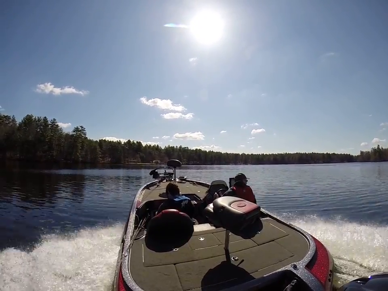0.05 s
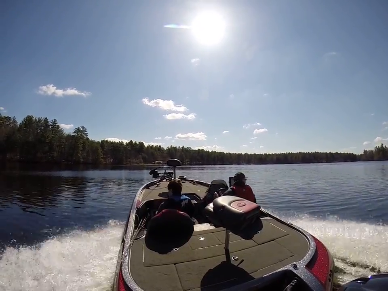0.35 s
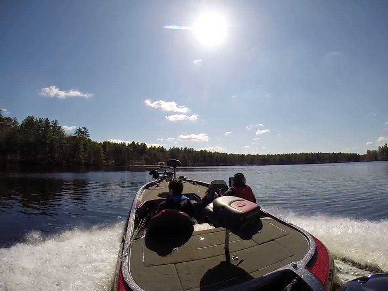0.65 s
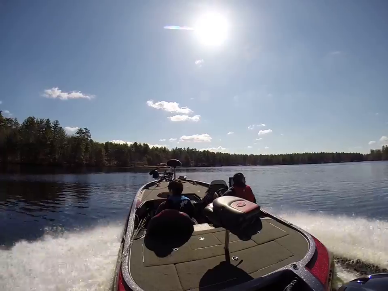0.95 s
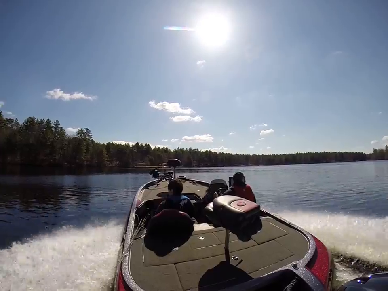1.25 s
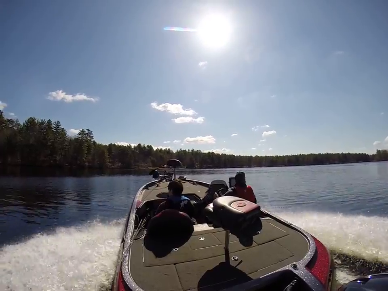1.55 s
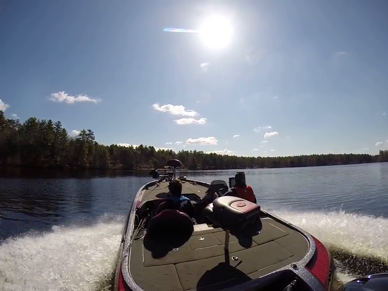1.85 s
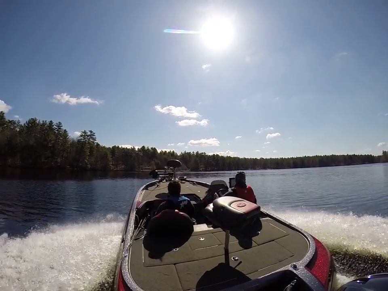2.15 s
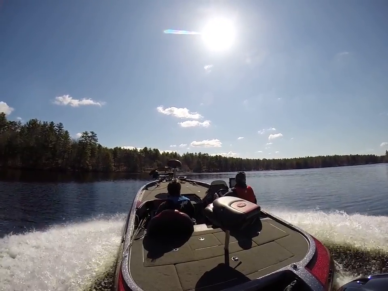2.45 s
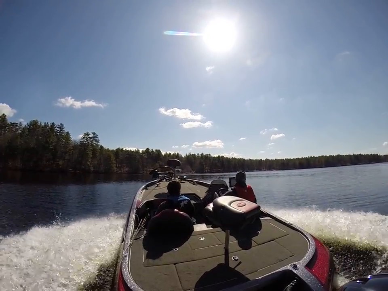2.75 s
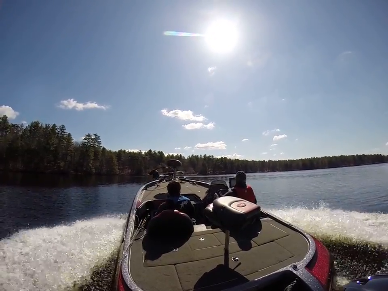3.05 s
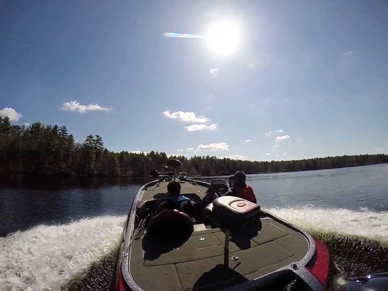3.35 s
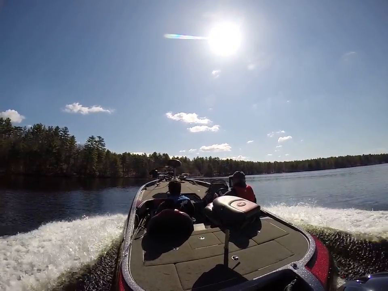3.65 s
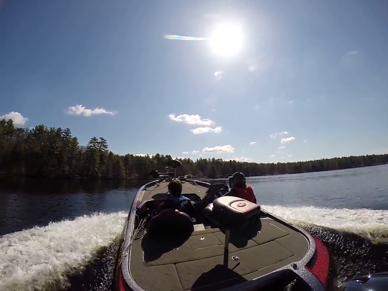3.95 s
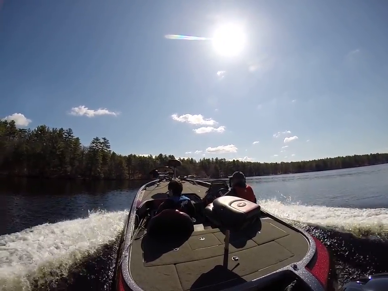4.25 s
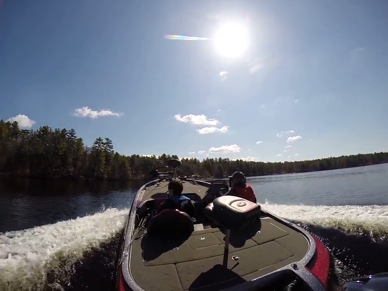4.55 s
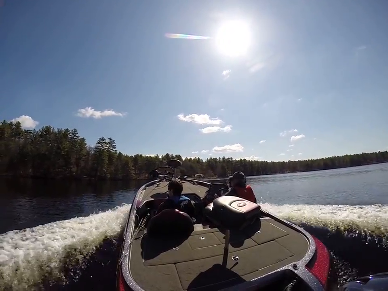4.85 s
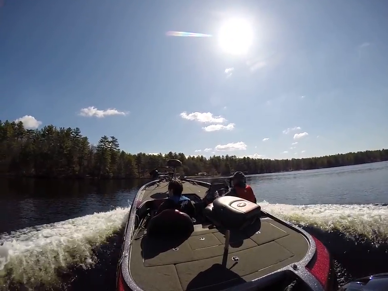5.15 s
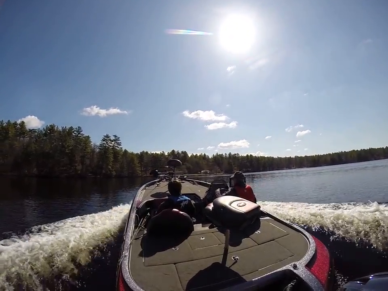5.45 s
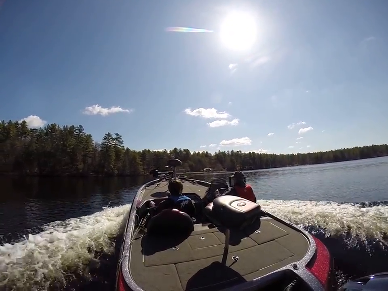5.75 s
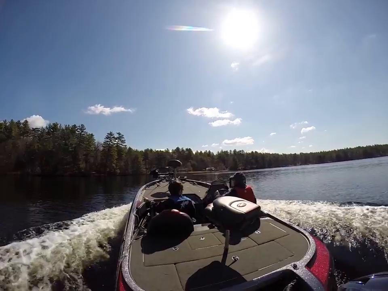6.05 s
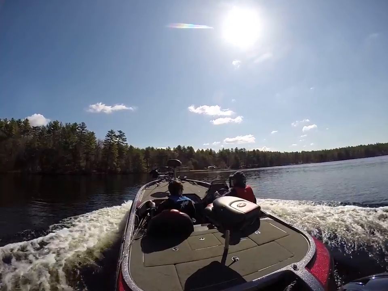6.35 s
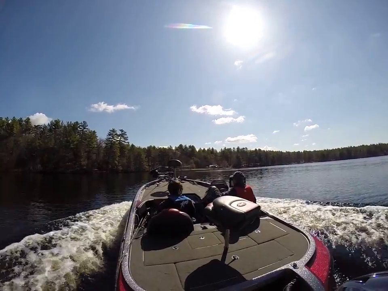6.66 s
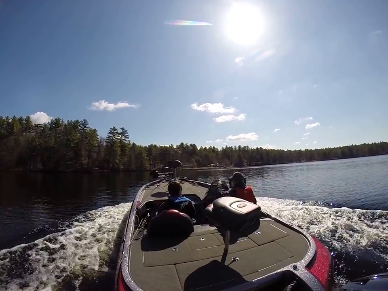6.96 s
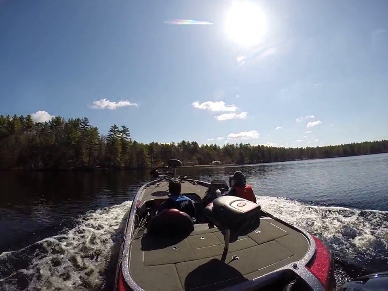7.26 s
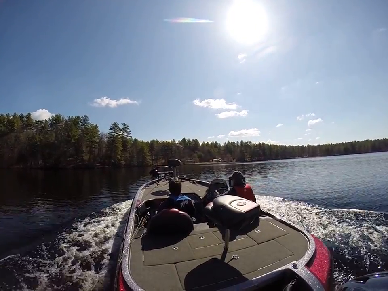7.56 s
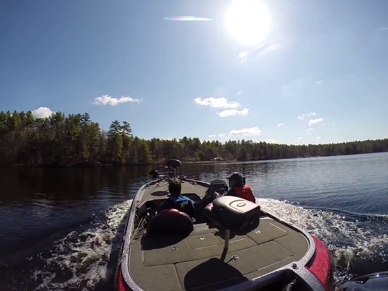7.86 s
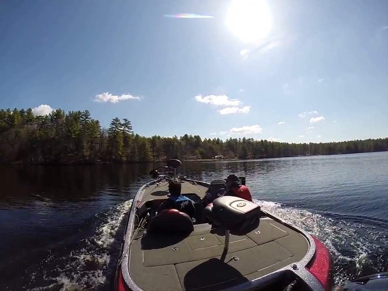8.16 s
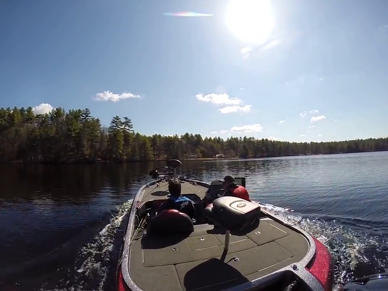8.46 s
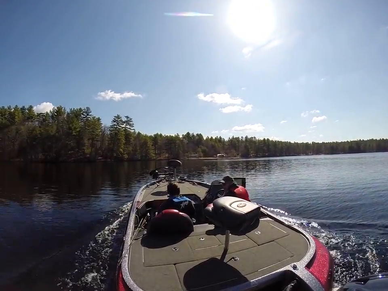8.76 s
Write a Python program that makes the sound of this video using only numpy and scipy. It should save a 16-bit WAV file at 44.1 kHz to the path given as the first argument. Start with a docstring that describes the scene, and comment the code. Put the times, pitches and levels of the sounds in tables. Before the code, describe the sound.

An outboard boat engine runs loudly from the start, heard close up at the stern: a deep, beating boom with a humming drone and a faint hollow roar. Beneath it the wake churns, spray hisses and the microphone's case buzzes thinly, with a few light ticks and knocks in the first three seconds. The engine's pitch sinks slowly until about 5 seconds, with the boom swelling around 3 to 4 seconds. From 4 to 7 seconds waves break in quick surges, with some slaps and rattles. The drone swells briefly near 5.4 seconds, then the pitch falls faster and the engine turns rough, ending almost an octave lower by 8 seconds. From 6 seconds the spray thins and the water breaks into separate laps, drips and thudding slaps on the hull, the strongest near 8.2 seconds. A low throbbing rumble continues to the end, at about 9 seconds.

```python
"""Outboard boat coming off the plane.

Propeller blades and exhaust banks of a four-stroke V6 beat in a deep boom. Engine orders drone in the
hull and cowl, sinking as the engine slows. The wake churns and slaps the stern, spray rushes past,
and a camera case on the stern buzzes, rattles and colours the water sounds."""
import sys
import numpy as np
from scipy import signal
from scipy.fft import rfft, irfft, next_fast_len
from scipy.io import wavfile
from scipy.ndimage import uniform_filter1d, minimum_filter1d

SR = 44100
rng = np.random.default_rng(int(sys.argv[2]) if len(sys.argv) > 2 else 0)


def log_audio(samples):
    """Write samples as a 16-bit WAV file to the path given in sys.argv[1]."""
    # one column per channel
    frames = np.atleast_2d(samples).T
    # limit to full scale, then quantise
    limited = np.clip(frames, -1, 1)
    pcm = np.round(limited * 32767).astype(np.int16)
    wavfile.write(sys.argv[1], SR, pcm)


N = 392931
T = np.arange(N) / SR
FFT_SIZE = next_fast_len(N + SR // 2)
HZ = np.fft.rfftfreq(FFT_SIZE, 1 / SR)

# Table levels are relative: gains and filters follow.
FIRING_RATE = [(0.0, 107.9), (0.55, 103.1), (1.3, 100.8), (2.0, 98.2), (2.8, 94.9), (3.4, 94.5),
               (4.2, 91.5), (4.5, 92.2), (4.8, 90.3), (5.1, 90.8), (5.45, 86.4), (5.85, 79.5), (6.3, 75.0),
               (6.85, 68.5), (7.5, 64.4), (7.9, 61.3), (8.3, 60.0), (8.91, 59.2)]  # (time [s], firing rate [Hz])
THROTTLE_OPENING = [(0, 0.73), (2.2, 0.92), (3.6, 0.78), (5.2, 0.22), (5.9, 0.49), (7, 0.06), (8.91, 0.34)]  # (time [s], opening [0-1])
BOOM_LEVELS = [(0.0, -37, -20.5, -38.5), (0.7, -20, -16, -23.5), (1.3, -35.5, -17, -23),
               (2.6, -31.5, -15.5, -27.5), (3.2, -10.5, -13, -25), (3.7, -12.5, -22.5, -26.5),
               (4.05, -6.5, -20.8, -25), (4.7, -20, -24, -24), (5.2, -20, -15, -22), (5.5, -16, -35, -22),
               (5.85, -10.5, -19.5, -22.7), (6.6, -14, -16.5, -23), (7.1, -24.5, -13, -20),
               (7.7, -34, -11, -22.5), (8.4, -21.5, -15.5, -22), (8.91, -41, -9, -27.5)]  # deep tones (time [s], bank [dB], blades [dB], firing [dB])
SHAKE_SPECTRUM = [(15, -24), (25, -9.5), (31, 2), (37, 18), (46, 8), (56, -3), (70, -26.5), (200, -83)]  # stern shaken by water (frequency [Hz], level [dB])
SHAKE_LEVEL = [(0, -12), (2.9, -12.5), (4, -12), (5.2, -15.5), (6.6, -20.5), (7, -29), (7.85, -32),
               (8.2, -14), (8.91, -6.5)]  # (time [s], level [dB])
STERN_RESPONSE = [(8, -19.5), (20, -1.5), (29, 2.5), (61, -1.5), (74, -8), (110, -20.5), (300, -57.5)]  # (frequency [Hz], gain [dB])
GURGLE_MODES = [(75, 19.5, 3), (116.7, 61, -7.5)]  # exhaust bubbles (frequency [Hz], width [Hz], gain [dB])
ORDERS = [(3.5, -19, -26), (4, -10, -20.5), (4.5, 10.5, -15.5), (5, -6.5, -4.5), (5.5, -8, -2),
          (6, -7.5, 6), (6.5, -4.5, -19.5), (7.5, 2, -10.5), (8, 1, -12.5), (9, -13, 2.5), (10, -3, -23),
          (10.5, -4.5, -13), (11.5, -13.5, -21), (12, -10, -0.5)]  # engine orders (crank multiple [1], loaded [dB], coasting [dB])
HULL_MODES = [(126.2, 27, -10), (168.2, 19.5, -2), (207.8, 14, -4.5), (251.5, 77, -15)]  # hull panels (frequency [Hz], width [Hz], gain [dB])
COWL_MODES = [(367.2, 28, -2.5)]  # engine cover (frequency [Hz], width [Hz], gain [dB])
DRONE_LEVELS = [(0, -21.5, -37.5), (.55, -22.5, -32), (1.5, -24, -35), (2.3, -24.5, -35),
                (2.45, -26.5, -33), (3.2, -27, -31.5), (3.4, -29, -34.5), (4.1, -27.5, -42),
                (4.6, -26.5, -32.5), (5.15, -27, -34.5), (5.38, -21.5, -32), (5.65, -29, -50),
                (6.4, -32.5, -50), (6.9, -30, -54), (7.65, -29.5, -52.5), (8.4, -28.5, -50.5),
                (8.91, -29, -56.5)]  # (time [s], hull [dB], cowl [dB])
COWL_HUM = [(0, 3, -67), (1.5, 7.5, -64), (2.3, -2, -61), (2.4, 5.5, -59), (3, 7, -53), (3.5, 4, -59),
            (4.2, -10, -54), (4.6, 6.5, -71), (5.4, 7.5, -57), (5.7, -5, -76), (8.91, 3, -77)]  # singing cover (time [s], order 12 lift [dB], order 24 level [dB])
INTAKE_MODES = [(482, 60, 0), (600, 31, 2.5), (672, 16, 1)]  # (frequency [Hz], width [Hz], gain [dB])

WATER_LEVELS = [(0, -43.5, -50.5, -48.5), (1.2, -42, -47.5, -46), (1.65, -43.5, -51.5, -47),
                (3.2, -45.0, -46, -49), (3.6, -45, -48, -49.5), (4.0, -42.5, -42, -50),
                (4.65, -41, -43.0, -52), (4.95, -44.5, -43, -50.5), (5.45, -42.5, -41.5, -52),
                (5.75, -48.5, -47.5, -55), (6.5, -47, -49, -56.5), (6.82, -50.5, -49, -57.5),
                (7.05, -48.0, -49.5, -56), (8.35, -47.5, -53, -57.5), (8.6, -53, -60, -59),
                (8.91, -51.0, -58, -57.5)]  # (time [s], wake [dB], case buzz [dB], spray [dB])
WAVES = [(3.16, 0.3, 2), (4.033, 0.032, 3.5), (4.14, 0.023, 3.5), (4.284, 0.032, 4), (4.637, 0.11, 3),
         (4.773, 0.04, 4.5), (5.21, 0.13, 2.5), (5.41, 0.047, 5.5), (5.56, .04, 4.5), (5.78, 0.054, 5),
         (5.925, 0.052, 6), (6.118, 0.067, 6), (6.337, 0.13, 5.5), (6.533, 0.031, 6), (6.687, 0.045, 4),
         (7.134, .08, 1.5), (7.505, 0.07, 1.5), (7.912, 0.049, 2), (8.42, 0.054, 2.5)]  # breaking waves (crest time [s], half length [s], lift [dB])
WAKE_SPECTRUM = [(150, -26), (280, 3), (380, 3), (460, 0), (570, -4), (700, -3), (1100, -2.5), (1450, -7),
                 (2200, -4), (3200, -14), (4500, -26), (9000, -72.5)]  # (frequency [Hz], level [dB])
BUZZ_SPECTRUM = [(500, -49.5), (1700, -25), (2200, -19.5), (2550, 5.5), (2780, 2.5), (3000, -5.5),
                 (3400, -15), (4200, -19), (9000, -79)]  # case buzz and knocks (frequency [Hz], level [dB])
SPRAY_SPECTRUM = [(1500, -23.5), (3200, 1.5), (4200, -5.5), (6000, -2), (6700, -8.5), (8000, -9),
                  (8900, -13.5), (10200, -14), (11200, -20), (12800, -17), (15000, -31.5)]  # (frequency [Hz], level [dB])
MIST_SPECTRUM = [(2500, -28.5), (5000, -9.5), (5900, 7.5), (6800, -3.5), (7700, -2), (8800, -9.5),
                 (10000, -5.5), (11200, -13), (12400, -15), (15000, -20)]  # (frequency [Hz], level [dB])
SLAP_SPECTRUM = [(100, -9), (200, 6), (400, 0.5), (1000, 3), (1800, -5), (3000, -13), (6000, -26.5),
                 (12000, -62)]  # (frequency [Hz], level [dB])
DROP_SPECTRUM = [(1500, -46.5), (3000, -13), (4200, -7), (5100, 9), (5800, -9), (7000, -24), (12000, -35)]  # (frequency [Hz], level [dB])
CASE_MODES = [(670, 39, 3), (947, 20, 5), (1176, 76, 4.5), (1552, 53, 6), (1736, 32, 6.5), (2020, 88, -1.5),
              (2285, 91, 4.5), (2640, 94, 1.5), (2740, 50, 5), (3354, 120, 4.5), (3690, 200, -4.5),
              (3900, 260, 5), (4540, 440, 6), (5530, 250, 3), (7510, 610, 5.5), (8380, 180, 2),
              (11900, 650, 0)]  # air and wall resonances (frequency [Hz], width [Hz], lift [dB])
STERN_SLAPS = [(4.024, -33, 0.027), (4.802, -33, 0.058), (5.35, -32, 0.047), (6.043, -38, 0.071),
               (6.292, -34.5, 0.12), (6.623, -38, 0.028), (6.695, -36, 0.03), (6.748, -37, 0.031),
               (6.983, -37, 0.036), (7.296, -40, 0.023), (7.48, -36, 0.025), (7.621, -39.5, 0.018),
               (7.814, -44, 0.031), (7.913, -36, 0.068), (7.966, -40, 0.025), (8.064, -38, 0.041),
               (8.178, -27.5, 0.072), (8.209, -31, 0.04), (8.549, -42, .03), (8.707, -42, 0.065),
               (8.794, -34.5, 0.047), (8.871, -39.5, 0.027)]  # (time [s], level [dB], burst T60 [s])
CASE_KNOCKS = [(.072, -35.5), (0.417, -38), (0.647, -36.5), (.739, -42), (2.531, -31), (4.024, -36),
               (4.129, -36), (5.42, -34.5), (5.457, -33), (5.528, -33), (5.907, -29), (6.179, -37),
               (6.35, -33), (6.592, -40), (8.063, -37), (8.177, -39), (8.208, -35)]  # (time [s], level [dB])
CASE_DROPS = [(0.2807, -47), (0.324, -37.5), (0.3969, -35), (0.4389, -44), (0.4687, -46), (1.8022, -41),
              (2.2138, -37), (4.2521, -51), (4.5046, -43), (6.291, -48), (6.695, -47), (6.722, -50),
              (6.747, -43), (7.7143, -51), (8.0635, -43), (8.177, -44), (8.2076, -45), (8.25, -46),
              (8.2754, -52), (8.4281, -55), (8.7899, -52)]  # (time [s], level [dB])
LEVEL_DIPS = [(1.836, 4.5, 0.05), (3.315, 5.5, 0.077)]  # (time [s], depth [dB], recovery [s])


def boom(crank_hz, blades=3, gear_ratio=1.75, limit_db=-5.5):
    """Blade and exhaust-bank pulses beat over a deep rumble; a soft limiter evens the crests."""
    bank_db, blade_db, firing_db = curves(BOOM_LEVELS)
    shake = at_level(noise(spectrum(SHAKE_SPECTRUM)), curves(SHAKE_LEVEL)[0], span_s=0.57)
    bank = amp(bank_db + 1) * tone(crank_hz * 3 / 2)  # three cylinders a bank, two turns a cycle
    propeller = amp(blade_db + 2) * tone(crank_hz * blades / gear_ratio)
    deep = bank + propeller + shake
    envelope = abs(signal.hilbert(deep, FFT_SIZE))[:N]
    deep /= (1 + (envelope / amp(limit_db)) ** 4) ** (1 / 4)
    deep = irfft(rfft(deep, FFT_SIZE) * spectrum(STERN_RESPONSE), FFT_SIZE)[:N]
    return deep + amp(firing_db) * tone(crank_hz * 3)


def drone(crank_hz, throttle, waver=0.34):
    """Engine orders sweep through hull and cowl resonances, over rough combustion noise."""
    hum_db, octave_db = curves(COWL_HUM)
    hull = amp(-8) * noise(modes(HULL_MODES))
    cowl = amp(-14) * noise(modes(COWL_MODES))
    for order, loaded_db, coasting_db in ORDERS:
        hz = crank_hz * order
        level_db = throttle * loaded_db + (1 - throttle) * coasting_db
        partial = amp(level_db) * (1 + waver * wander(7.6)) * tone(hz)
        if order == 12:
            partial *= amp(hum_db)
        hull += partial * modes(HULL_MODES, hz)
        cowl += partial * modes(COWL_MODES, hz)
    hull_db, cowl_db = curves(DRONE_LEVELS)
    octave = tone(crank_hz * 24) * amp(octave_db) * (1 + waver * wander(9))
    hull = at_level(hull, hull_db + 0.05, span_s=0.35)
    cowl = at_level(cowl, cowl_db - 0.5, span_s=0.33)
    return hull + cowl + octave


def gurgle(throttle):
    """Exhaust bubbles out under water, louder with throttle."""
    return amp(-32 + 7 * (throttle - 0.5)) * noise(modes(GURGLE_MODES))


def intake(crank_hz, top_db=-46.5, db_per_octave=47.5):
    """Hollow roar of indrawn air, fading as the engine slows."""
    return amp(top_db + db_per_octave * np.log2(crank_hz / crank_hz.max())) * noise(modes(INTAKE_MODES))


def wake(level_db, coasting):
    """Churning water breaks into separate laps as the throttle closes."""
    lap_share = 0.51 * coasting
    churn = splashes(WAKE_SPECTRUM, per_s=1500, spread_db=2.5, share=0.18, flicker_db=1.4, rate_hz=30.5)
    laps = splashes(WAKE_SPECTRUM, per_s=330, spread_db=2.3, share=0.92, flicker_db=2.3, rate_hz=34.95)
    return amp(level_db + 2) * (np.sqrt(1 - lap_share) * churn + np.sqrt(lap_share) * laps)


def slaps(thud_db=13.5, ring_t60_s=0.2):
    """Water slaps the stern and rings hull and cowl; longer slaps thud harder."""
    t = np.arange(SR // 4) / SR
    partials = [(hz, db) for hz, _, db in HULL_MODES] + [(COWL_MODES[0][0], -11)]
    body = sum(amp(db - 60 * t / ring_t60_s) * np.sin(2 * np.pi * hz * t) for hz, db in partials)
    splash = case_response(SLAP_SPECTRUM)
    longest_s = max(t60_s for _, _, t60_s in STERN_SLAPS)
    mix = np.zeros(N)
    for start_s, db, t60_s in STERN_SLAPS:
        add(mix, start_s, hit(splash, db, t60_s))
        add(mix, start_s, hit(body, db + thud_db, t60_s) * t60_s / longest_s)
    return mix


def case_buzz(level_db):
    """The case buzzes in the rush of water."""
    buzz = splashes(BUZZ_SPECTRUM, per_s=370, spread_db=1.5, share=0.46, flicker_db=3, rate_hz=35.9)
    return amp(level_db - 1) * buzz


def spray(level_db, coasting):
    """Dense droplets hiss; fine mist dies away as the throttle closes."""
    hiss = splashes(SPRAY_SPECTRUM, per_s=1700, spread_db=3, share=0.3, flicker_db=1.27, rate_hz=45.25)
    mist = amp(-4 - 14 * coasting) * noise(spectrum(MIST_SPECTRUM))
    return amp(level_db) * (hiss + mist)


def rattles():
    """The case knocks in its mount."""
    return hit_train(CASE_KNOCKS, BUZZ_SPECTRUM, t60_s=0.035)


def drops():
    """Single drops tick on the case."""
    return amp(-1) * hit_train(CASE_DROPS, DROP_SPECTRUM, t60_s=0.023)


def patter(coasting):
    """Sparse droplets fall from the wake onto the stern, louder when coasting."""
    taps = splashes(SLAP_SPECTRUM, per_s=60, spread_db=2, share=1, flicker_db=2, rate_hz=5.3)
    return amp(-55.5) * coasting * taps


def dips(fall_s=0.008):
    """Gain that drops briefly and recovers."""
    cut_db = 0
    for start_s, depth_db, recovery_s in LEVEL_DIPS:
        t = np.maximum(T - start_s, 0)
        cut_db += depth_db * np.minimum(t / fall_s, 1) * np.exp(-t / recovery_s)
    return amp(-cut_db)


def splashes(points, per_s, spread_db, share, flicker_db, rate_hz):
    """Droplets in a flickering wash, through the case; share is the droplets' part of the power."""
    sizes = amp(spread_db * np.minimum(rng.exponential(1, N), 5)) * rng.choice([-1, 1], N)
    droplets = unit_rms(sizes * (rng.random(N) < per_s / SR))
    drive = np.sqrt(share) * droplets + np.sqrt(1 - share) * rng.standard_normal(N)
    drive *= amp(flicker_db * wander(rate_hz))
    return unit_rms(signal.oaconvolve(drive, case_response(points))[:N])


def case_response(points, size=4096):
    """Minimum-phase impulse response of a spectrum plus the case resonances."""
    hz = np.fft.rfftfreq(size, 1 / SR)
    case_db = sum(db / (1 + (2 * (hz - f) / width) ** 2) for f, width, db in CASE_MODES)
    log_gain = np.log(spectrum(points, hz) * amp(case_db))
    mirrored = np.concatenate([log_gain, log_gain[-2:0:-1]])
    return np.fft.ifft(np.exp(np.conj(signal.hilbert(mirrored)))).real


def hit(response, level_db, t60_s, attack_s=0.001):
    """A decaying noise burst drives a response; level is that of the loudest 2 ms."""
    t = np.arange(SR // 4) / SR
    burst = rng.standard_normal(len(t)) * amp(-60 * t / t60_s) * (1 - np.exp(-t / attack_s))
    sound = signal.fftconvolve(burst, response)
    return amp(level_db) * sound / np.sqrt(uniform_filter1d(sound ** 2, size=88).max())


def hit_train(events, points, t60_s):
    """Timed hits of one timbre, through the case."""
    mix, response = np.zeros(N), case_response(points)
    for start_s, db in events:
        add(mix, start_s, hit(response, db, t60_s))
    return mix


def amp(db):
    """Decibels to gain."""
    return 10 ** (np.asarray(db) / 20)


def unit_rms(x):
    """Scale to rms 1."""
    return x / np.sqrt(np.mean(x ** 2) + 1e-20)


def curves(rows):
    """Table columns, linear in time."""
    times_s, *columns = np.transpose(rows)
    return [np.interp(T, times_s, column) for column in columns]


def spectrum(points, hz=HZ):
    """Gain interpolated over log frequency."""
    f, db = np.transpose(points)
    return amp(np.interp(np.log(hz + 1), np.log(f), db))


def modes(rows, hz=HZ):
    """Gain of steep-sided resonances."""
    return sum(amp(db) / (1 + ((hz - f) / width) ** 2) ** 2 for f, width, db in rows)


def noise(gain):
    """Shaped noise, rms 1."""
    return unit_rms(irfft(rfft(rng.standard_normal(FFT_SIZE)) * gain, FFT_SIZE)[:N])


def tone(hz):
    """Gliding sine, rms 1."""
    return np.sqrt(2) * np.sin(2 * np.pi * (np.cumsum(hz) / SR + rng.random()))


def wander(rate_hz):
    """Random drift, rms near 1."""
    knots = rng.standard_normal(2048)
    return np.interp(T * rate_hz * 2, np.arange(len(knots)), knots) / np.sqrt(2 / 3)


def at_level(x, level_db, span_s):
    """Make the running rms follow level_db."""
    size = int(span_s * SR)
    power = uniform_filter1d(uniform_filter1d(x ** 2, size), size)
    return amp(level_db) * x / np.sqrt(abs(power) + 1e-12)


def add(mix, start_s, sound):
    """Mix a sound in at start_s."""
    part = mix[round(start_s * SR):][:len(sound)]
    part += sound[:len(part)]


def scene():
    """Engine and water at the stern, mono; breaking waves lift wake, buzz and spray."""
    crank_hz = curves(FIRING_RATE)[0] / 3  # three firings a turn
    crank_hz *= 1 + 0.0011 * wander(5)
    throttle = curves(THROTTLE_OPENING)[0]
    coasting = 1 - throttle
    engine = boom(crank_hz) + gurgle(throttle) + drone(crank_hz, throttle) + intake(crank_hz)
    wake_db, buzz_db, spray_db = curves(WATER_LEVELS)
    wave_db = sum(db * np.exp(-((T - crest_s) / half_s) ** 2) for crest_s, half_s, db in WAVES)
    water = wake(wake_db + 0.9 * wave_db, coasting)
    water += case_buzz(buzz_db + 0.8 * wave_db)
    water += spray(spray_db + 0.81 * wave_db, coasting)
    impacts = drops() + rattles() + slaps() + patter(coasting)
    return (dips() * (engine + water + impacts))[None]


def record(dry, ceiling=0.8, cutoff_hz=15300):
    """Smooth peak limiter, then low-pass."""
    gain = ceiling / np.maximum(abs(dry), ceiling)
    gain = uniform_filter1d(minimum_filter1d(gain, size=1800), size=1800)
    lowpass = signal.firwin(511, cutoff_hz, window=("kaiser", 9), fs=SR)
    return signal.oaconvolve(dry * gain, lowpass[None], "same")


dry = scene()
out = record(dry)
log_audio(out)
```